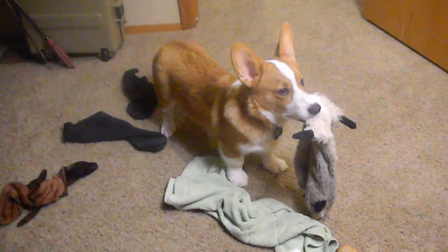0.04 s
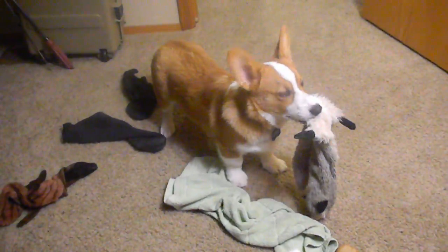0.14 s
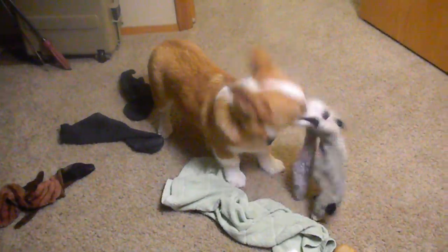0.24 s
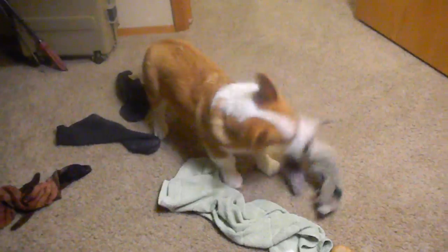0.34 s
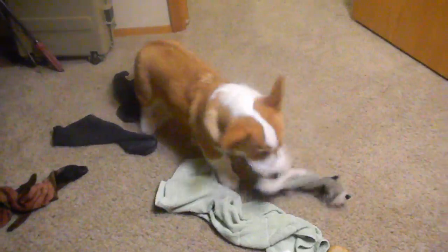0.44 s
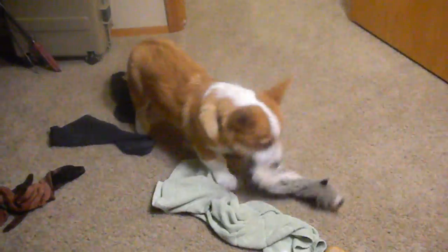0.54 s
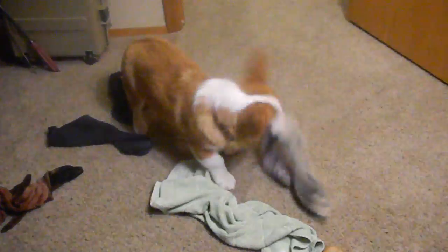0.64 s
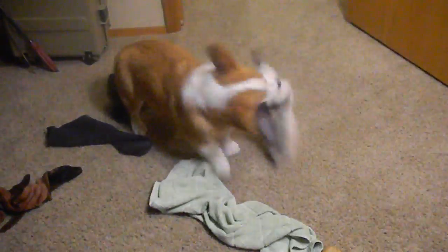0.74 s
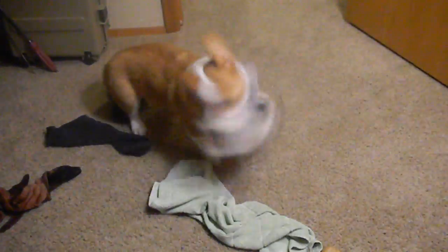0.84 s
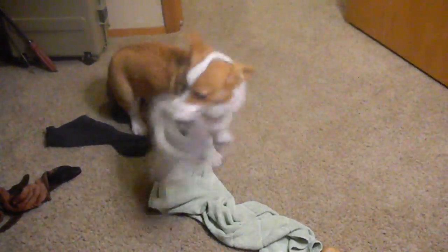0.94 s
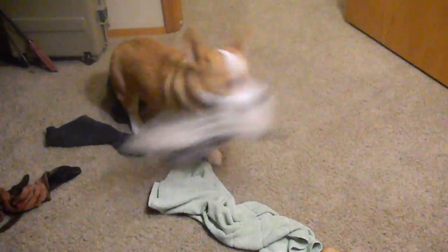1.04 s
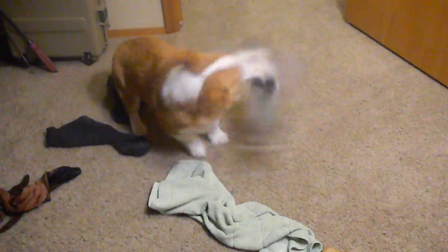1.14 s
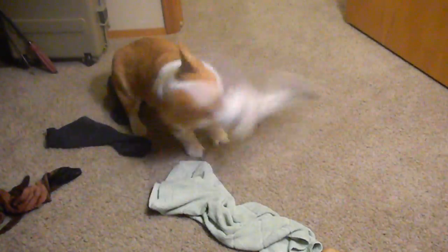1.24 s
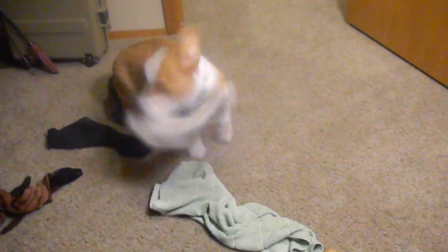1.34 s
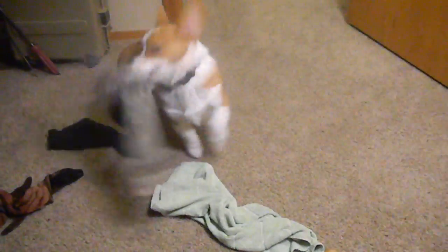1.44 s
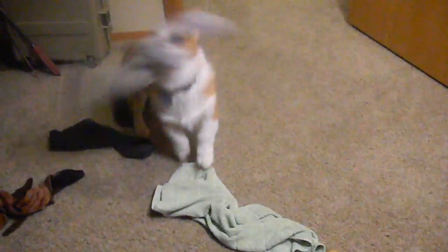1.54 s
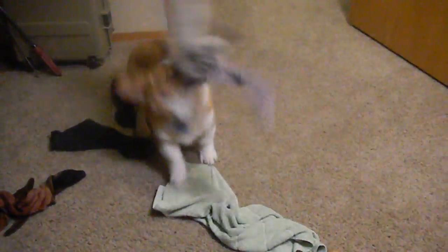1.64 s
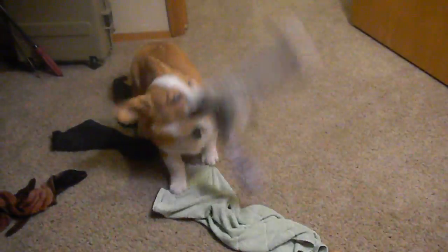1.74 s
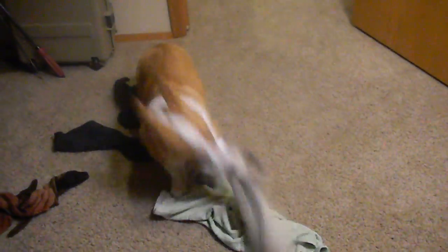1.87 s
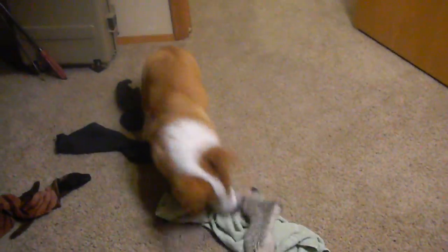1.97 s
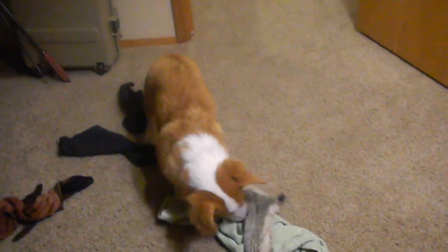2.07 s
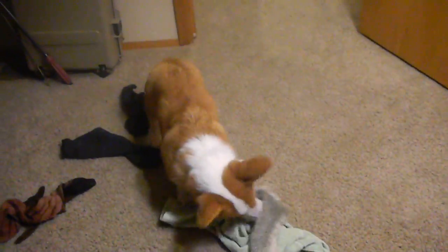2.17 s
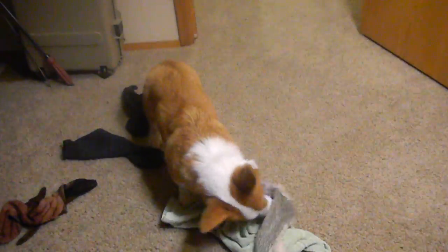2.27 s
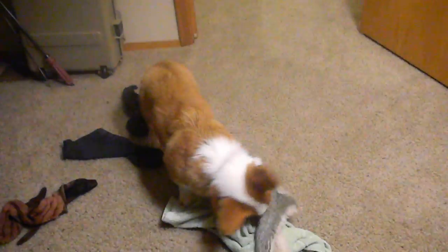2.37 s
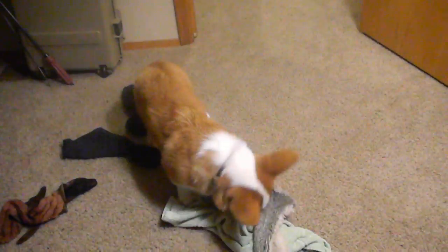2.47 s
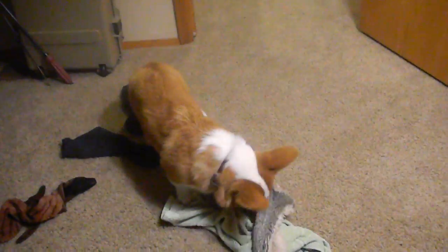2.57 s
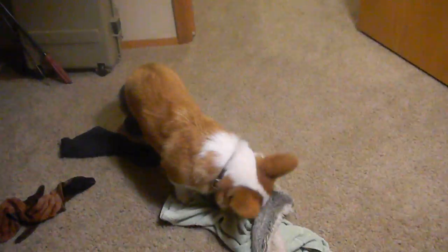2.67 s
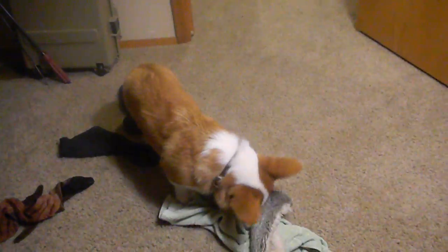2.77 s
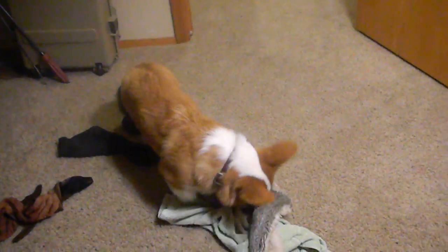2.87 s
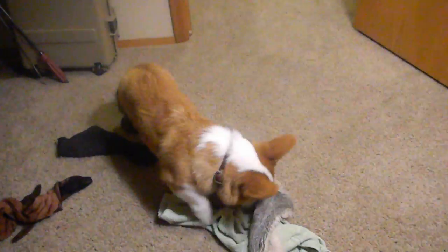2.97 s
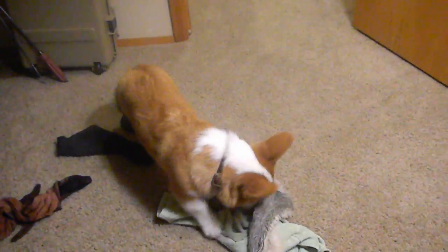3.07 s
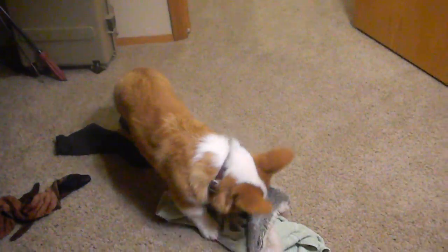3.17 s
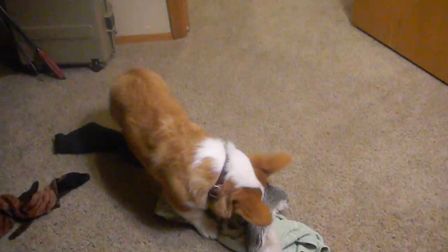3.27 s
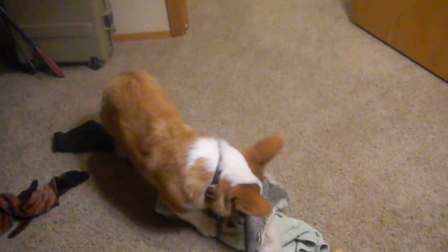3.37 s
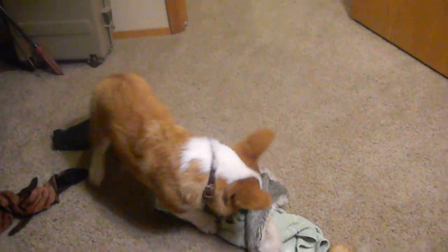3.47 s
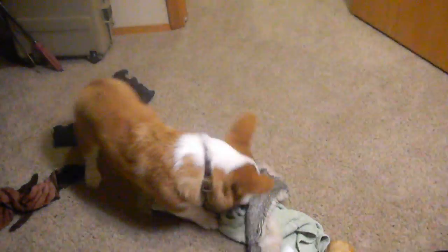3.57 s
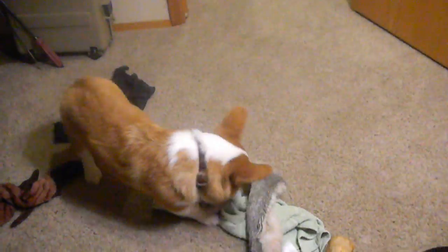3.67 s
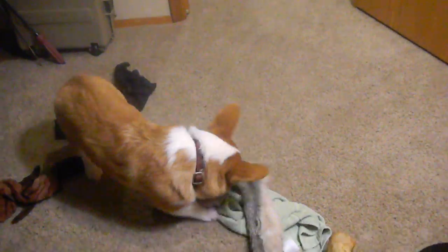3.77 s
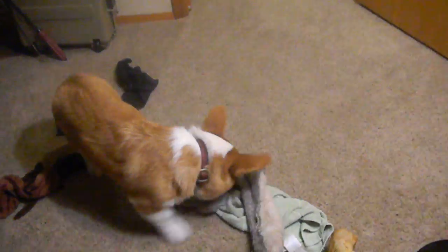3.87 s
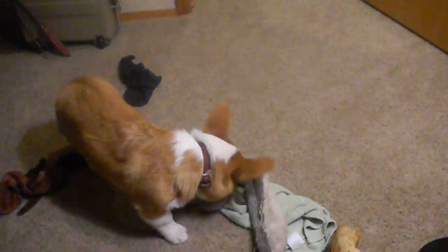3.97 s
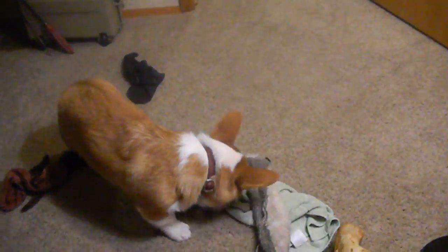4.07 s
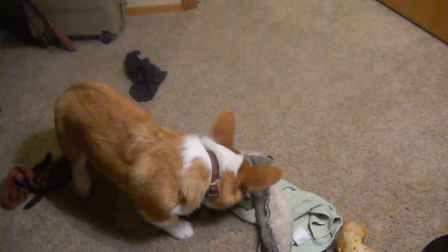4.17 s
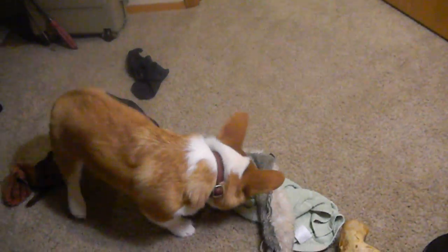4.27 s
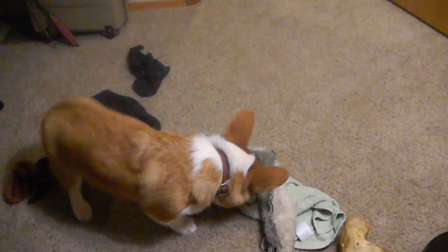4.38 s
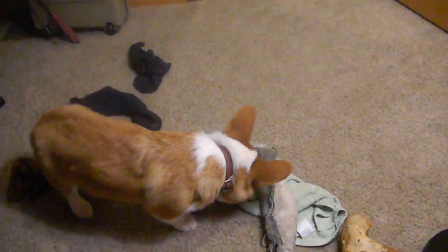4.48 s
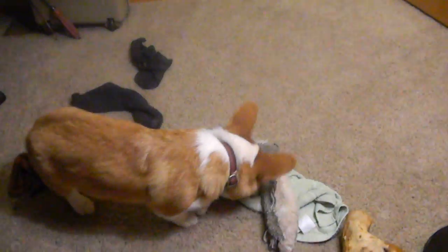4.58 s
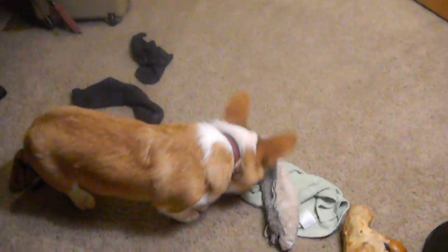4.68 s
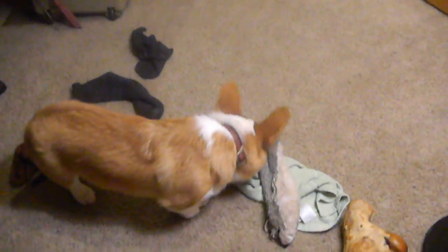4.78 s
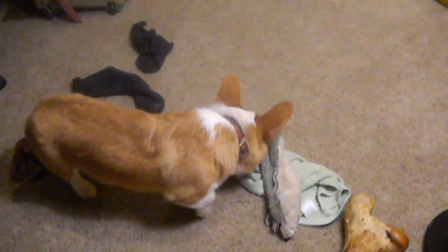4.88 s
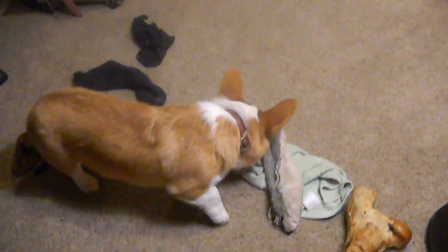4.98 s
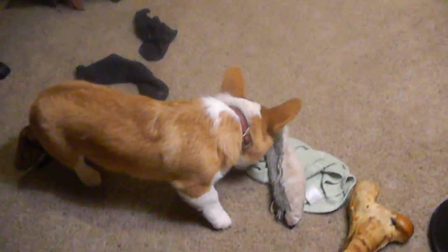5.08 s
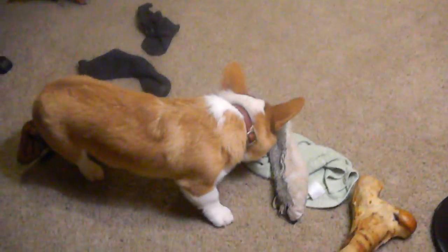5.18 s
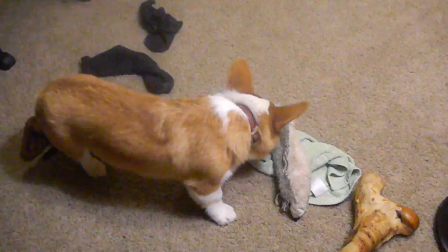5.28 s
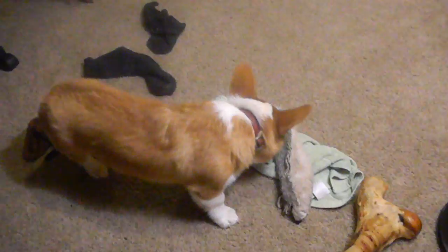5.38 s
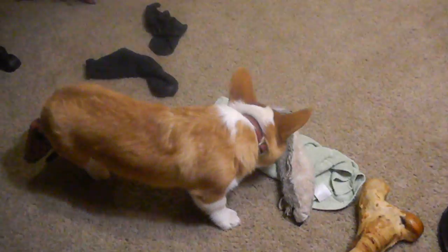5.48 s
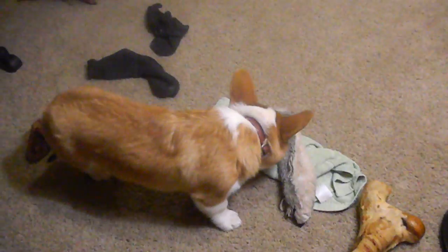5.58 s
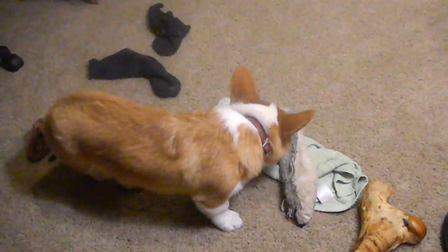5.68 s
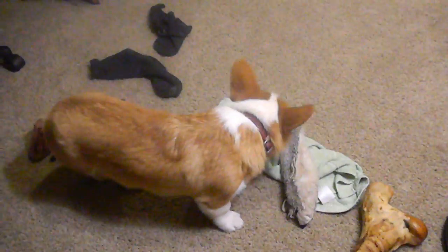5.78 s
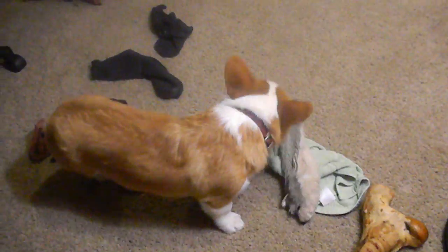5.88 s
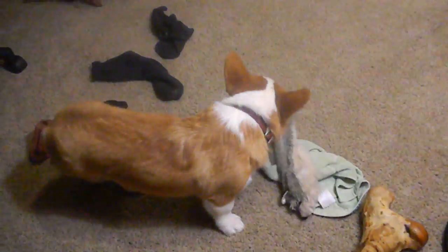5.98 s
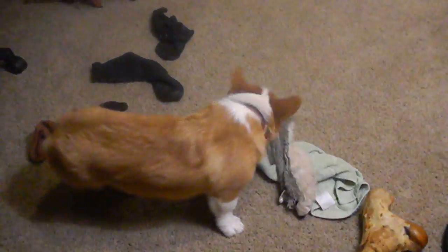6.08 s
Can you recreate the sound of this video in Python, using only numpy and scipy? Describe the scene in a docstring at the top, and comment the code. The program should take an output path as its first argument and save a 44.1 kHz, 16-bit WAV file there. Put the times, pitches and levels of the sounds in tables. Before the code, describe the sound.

Low room noise, a faint fan hum and thin hiss run throughout a small, carpeted, briefly reverberant room. Soft plush rustle starts around 0.6 seconds; crisp cloth and collar flicks cluster at 0.9 to 1.0, then a short dull slap at 1.2. More light flicks and a thump come near 1.4, rustling swishes at 1.7 to 1.8, and a hard slap with snaps and a deep floor boom at 1.95 to 2.1. It quietens to gentle rubbing, a hollow knock at 2.75, and very faint peeps at 2.9, 3.8 and 4.35. Chewing rustle continues from 4.3. A bright swooping squeak sounds at 4.57, a short nasal one at 4.9, then from 5.04 rapid irregular chirps, a longer loud blare at 5.23, a bright snap at 5.3, clustered squeaks at 5.4 to 5.75 and 5.85 to 6.1, mixed with small dull thuds. Close stereo pickup, slightly louder right.

```python
"""A puppy and its squeaking toy

A puppy shakes a plush toy, slaps it on the carpet, pounces, then chews on the squeaker inside.
Each bite drives air through a small plastic reed, a harmonic source whose pitch follows the push;
the reed sounds again as the bulb refills. Filtered noise makes the rustle, slaps and snaps,
and decaying modes the booms and rings. A small carpeted room answers briefly; a fan hums behind it all."""
import sys
import numpy as np
from scipy import signal
from scipy.fft import rfft, irfft, next_fast_len
from scipy.io import wavfile

SR = 44100
rng = np.random.default_rng(int(sys.argv[2]) if len(sys.argv) > 2 else 0)


def master(y):
    """Save y as 16-bit WAV."""
    cut = np.clip(np.atleast_2d(y).T, -1, 1)
    pcm = np.round(cut * 32767)  # scale
    wavfile.write(sys.argv[1], SR, pcm.astype(np.int16))


N = 269892
TIME = np.arange(N) / SR  # seconds

# Spectrum of the room air. Each row: frequency in Hz, relative power density in dB.
AIR_SPECTRUM = [(15, -43), (25, -33), (48, -11.5), (84, -4.5), (113, -9.5), (216, -6), (248, -17),
                (371, -2), (604, -14), (834, -15.5), (1320, -20), (1870, -22.5), (2520, -23.5),
                (2810, -26.5), (15800, -31)]
# Near reflections from door, case and walls. Each row: delay in seconds, level in dB before colouring.
REFLECTIONS = [(.0031, -45), (.0074, -21.5), (0.0105, -12.5), (0.0172, -16), (.0235, -16)]
# Spectrum of those reflections, weak in the bass. Each row: frequency in Hz, gain in dB.
REFLECTION_SPECTRUM = [(100, -10), (3000, -3), (10000, 2.5)]
# Spectrum of the reverberant tail. Each row: frequency in Hz, relative gain in dB.
TAIL_SPECTRUM = [(60, -10), (250, -3), (390, 9.5), (600, 3), (1300, 1), (2600, -0.5), (5000, 1.5),
                 (10000, -0.5), (16000, -13)]
# Gain of the tail's opposite-sign part in the two channels. Each row: frequency in Hz, gain in dB.
TAIL_SIDE = [(100, 2), (1300, -12.5), (4000, -5.5), (9000, -1.5), (13000, 8)]
# Balance of the two microphones. Each row: frequency in Hz, left minus right in dB.
LEFT_MINUS_RIGHT = [(60, -3), (500, -4), (2000, -4), (4000, -2.5), (8000, -2), (14000, -2)]
TOP_HZ = 15900  # upper limit of the overtones and of the final sound

# Strokes of plush and fur over the carpet.
# Each row: middle in seconds, half length in seconds (to 1/e), level in dB.
STROKES = [(0.645, 0.22, -49.5), (0.918, 0.072, -50), (1.082, 0.12, -50), (1.39, 0.11, -48.5),
           (1.694, 0.039, -46), (1.811, 0.054, -42), (2.022, 0.11, -52.5), (2.47, 0.047, -51.5),
           (2.638, 0.063, -47.5), (2.83, 0.13, -52.5), (3.522, 0.084, -51), (3.755, 0.019, -49.5),
           (3.937, 0.088, -44.5)]
# Spectrum of the rubbing fibres. Each row: frequency in Hz, relative gain in dB.
FIBRE_SPECTRUM = [(200, 1), (600, -2), (1500, -1.5), (2400, -3.5), (4500, -11.5), (9000, -18),
                  (16000, -14.5)]
CHEW_FROM_S, CHEW_RISE_S, CHEW_DB = 4.33, 0.29, -50  # the plush rustles on while it is chewed

# Blows of toy, paws and jaw on the floor. Each row: start in seconds, level in dB, upper edge of the slap
# in Hz, 60 dB decay of the push in seconds, boom in dB before a fixed 12 dB cut.
BLOWS = [(1.1828, -20.5, 2100, 0.0096, -17), (1.192, -33, 750, 0.044, -2.5),
         (1.411, -29, 1150, 0.023, -4.5), (1.768, -32, 1130, 0.05, -19), (1.9802, -19, 2700, 0.015, -34),
         (1.987, -27, 530, 0.03, -8), (2.047, -31.5, 242, .11, 0.5), (2.072, -42, 109, 0.33, 6),
         (4.635, -41, 186, .06, 1), (5.045, -38, 88, .022, -10), (5.163, -31.5, 523, 0.029, -11),
         (5.481, -37.5, 150, 0.047, -0.5), (5.533, -39.5, 102, 0.046, 2), (5.615, -28, 665, 0.017, -22),
         (5.873, -27.5, 590, 0.01, -14), (6.033, -35.5, 148, 0.034, -8)]
# Modes of the floor under the carpet. Each row: nominal frequency in Hz, relative level in dB,
# nominal 60 dB decay in seconds.
FLOOR_MODES = [(58.4, -3, 0.25), (85, -17, 0.11), (139, 6, 0.2), (172.6, 3, 0.23), (227, 2.5, 0.17)]
# Collar and toy flicking and snapping.
# Each row: start in seconds, level in dB, centre in Hz, 60 dB decay in seconds.
FLICKS = [(0.882, -35.5, 4640, 0.044), (.9224, -31, 1750, 0.022), (.963, -31.5, 6000, 0.032),
          (0.989, -38, 7260, 0.17), (1.018, -21, 6200, 0.026), (1.342, -36, 7140, 0.059),
          (1.362, -36.5, 5500, 0.046), (1.373, -38, 2480, 0.051), (1.8, -34.5, 4000, 0.045),
          (1.949, -21.5, 1990, 0.0061), (1.958, -25.5, 7900, .036), (1.973, -32, 3200, .027),
          (1.982, -19, 2360, 0.0073), (5.304, -21, 8800, 0.031)]
# Modes of the collar buckle. Each row: nominal frequency in Hz, relative level in dB,
# nominal 60 dB decay in seconds.
BUCKLE_MODES = [(5240, -18, .08), (6860, -5, 0.13), (7150, -2, 0.13), (9800, -29, .12), (12000, 7, 0.1)]
# The hollow knock as the muzzle drives the toy into the floor.
# Each row: frequency in Hz, level in dB, 60 dB decay in seconds.
KNOCK_MODES = [(160, -28.5, 0.15), (380.8, -25.5, 0.12), (432, -21.5, 0.047), (660, -21.5, 0.039)]
KNOCK_S = 2.7548  # start of the knock

# Radiation of the reed through bulb and plush as the bulb refills.
# Each row: frequency in Hz, relative gain in dB.
BLARE = [(700, 12), (1200, -0.5), (2500, 2), (3700, -5.5), (5000, -6.5), (6200, -9.5), (7500, -5),
         (8700, -5), (10000, -5), (11300, -11.5), (12400, -11), (13600, -23), (15500, -26)]
# Radiation of the reed on bites, chirps and peeps. Each row: frequency in Hz, relative gain in dB.
WHISTLE = [(700, -8), (1200, 5), (2400, 3.5), (3600, -4), (4900, -5), (5900, -17), (7600, -7.5),
           (8400, -11.5), (9750, -0.5), (11000, -19.5), (11900, -6.5), (13200, -30), (15000, -22)]
# Bites press the air out: the pitch swells to a crest and sinks as the bulb empties.
# Each row: start in seconds, length in seconds, crest in seconds after the start, half width of the crest
# in seconds, top in Hz, end in Hz, level in dB before the airflow, overtone tilt in dB per octave,
# presence in dB, roughness from 0 to 1.
BITES = [(4.571, 0.12, .028, .015, 2590, 1039, -19, -3.5, 1, 0.46),
         (5.421, 0.075, 0.023, 0.014, 2430, 1332, -18, 0.3, -3, 0.54),
         (5.54, .019, 0.0066, 0.0079, 1406, 1210, -15.5, 0.4, -3.5, 0.46),
         (6, .058, .018, .016, 1431, 1105, -16.5, -1, 1, 0.39),
         (6.07, 0.045, 0.02, 0.0067, 1357, 1226, -18, 0.4, 0.5, 0.59)]
# The jaw lets go and the bulb sucks air back in with a steadier blare.
# Each row: start in seconds, length in seconds, crest in seconds after the start, half width of the crest
# in seconds, top in Hz, end in Hz, level in dB before the airflow, overtone tilt in dB per octave,
# presence in dB, roughness from 0 to 1.
REFILLS = [(4.913, 0.036, 0.017, 0.0092, 1251, 1096, -14, 0.93, 4, 0.21),
           (5.227, .081, 0.035, .011, 1285, 1259, -11, 2, -2.5, 0.11),
           (5.599, 0.055, .025, 0.017, 1407, 1256, -14.5, 0.045, -3.5, 0.28),
           (5.659, 0.046, 0.023, 0.014, 1174, 1152, -16.5, -0.74, -3, .12),
           (5.921, 0.046, 0.017, .015, 1257, 1140, -13, -0.38, 9.5, 0.13)]
# Fast glides up or down under hard bites. Each row: start in seconds, length in seconds, first pitch in Hz,
# last pitch in Hz, level in dB before the airflow, presence in dB, roughness from 0 to 1.
CHIRPS = [(5.039, .018, 1280, 3470, -18, 2.5, 0.37), (5.14, .012, 2768, 1310, -16.5, -6, 0.35),
          (5.155, 0.01, 1334, 3190, -15, -2, 0.22), (5.175, 0.024, 2805, 1125, -19, -5.5, 0.61),
          (5.307, 0.0074, 1317, 1130, -14, 0, 0.26), (5.749, .011, 1346, 3300, -22, 4, 0.63),
          (5.853, .017, 2342, 1637, -20, 8, 0.5), (5.873, 0.014, 2480, 1280, -19, 7, 0.73)]
# Light nudges barely sound the reed. Each row: start in seconds, middle pitch in Hz, level in dB.
PEEPS = [(2.888, 1078, -41.5), (3.843, 1045, -43), (4.350, 1045, -42.5)]
# length in s, overtone tilt in dB per octave, roughness 0-1, fall of pitch in Hz per s
PEEP_S, PEEP_TILT_DB, PEEP_ROUGH, PEEP_SAG_HZ_PER_S = 0.017, -22, 0.73, 7400
# a squeeze starts from REST_HZ; the reed all but stops below STALL_HZ,
# strengthens over about OPEN_HZ above that, and closes at SHUT_HZ
REST_HZ, STALL_HZ, OPEN_HZ, SHUT_HZ = 1195.4, 1021.5, 353, 4120
CREST_STEEPNESS = 3.6  # how square the push of the jaw is
CHIRP_S, CHIRP_TILT_DB = 0.006, 0.17  # time constant of the glide; overtones in dB per octave
ATTACK_S, RELEASE_S = 0.002, 0.0026
BUILD_DB, BUILD_S = 6, 0.015  # a bite starts this much weaker and firms up with this time constant
TREMOR_DB, TREMOR_PER_S = 1.0, 137  # unsteady grip of the teeth
PRESENCE_HZ, PRESENCE_OCTAVES = 4000, 0.95  # band that varies as plush and muzzle uncover the squeaker
WOBBLE, WOBBLE_PER_S = 0.02, 150  # relative pitch wobble at full roughness; changes per second


def undb(db):
    """Decibels are logarithmic: amplitude gain is ten to the power of dB / 20."""
    return 10 ** (np.asarray(db) / 20)


def unit(x):
    """Normalisation: scale to root mean square 1."""
    return x / np.sqrt(np.mean(x ** 2) + 1e-18)


def gain_at(hz, points):
    """Spectral interpolation: gain from (Hz, dB) points, linear in dB over log frequency."""
    f, db = np.transpose(points)
    return undb(np.interp(np.log(np.maximum(hz, 1)), np.log(f), db))


def colour(x, points):
    """Linear filtering: multiply the spectrum of a sound by a (Hz, dB) curve."""
    length = x.shape[-1]
    size = next_fast_len(length + 2048)
    gain = gain_at(np.fft.rfftfreq(size, 1 / SR), points)
    return irfft(rfft(x, size) * gain, size)[..., :length]


def resonate(x, hz, q):
    """Resonance: a second-order peak with gain 1 at its centre."""
    hz = min(hz, SR / 3)
    b, a = signal.iirpeak(hz, max(q, 3 * hz / SR), fs=SR)
    return signal.lfilter(b, a, x)


def wander(size, rate):
    """Random modulation: rms 1, straight lines between `rate` random values a second."""
    knots = np.arange(size) * rate / SR
    count = int(knots[-1]) + 2
    return unit(np.interp(knots, np.arange(count), rng.standard_normal(count)))


def fade(t, t60):
    """Exponential decay: 60 dB lost in t60 seconds."""
    return np.exp(-np.log(1000) * t / t60)


def ring(modes, t):
    """Modal superposition: a struck body sounds as a sum of decaying sines."""
    return sum(undb(db) * np.sin(2 * np.pi * hz * t) * fade(t, t60) for hz, db, t60 in modes)


def add(track, s, x):
    """Superposition: mix x into the track from time s."""
    start = int(s * SR)
    track[start:start + len(x)] += x[:max(N - start, 0)]


def background(air_db=-50, fan_db=-55, hiss_db=-61, apart_db=-14):
    """Stationary noise: room air, a fan's hum by resonance, and a separate thin hiss in each channel."""
    air = unit(colour(rng.standard_normal(N), AIR_SPECTRUM))
    apart = unit(colour(rng.standard_normal(N), AIR_SPECTRUM)) * np.array([[1], [-1]])
    fan = unit(resonate(resonate(rng.standard_normal(N), 388.0, 11.0), 384.7, 10.0))
    hiss = colour(rng.standard_normal((2, N)), [(1000, 15.2), (6000, 9.3), (15000, 7.8)])
    wide_air = undb(air_db) * (air + undb(apart_db) * apart)
    return wide_air + undb(fan_db) * fan + undb(hiss_db) * hiss


def room(x, t60=0.2, tail_db=-6.5, build=0.0045):
    """Convolution with an impulse response: direct sound, near reflections and a short stereo tail."""
    t = np.arange(SR // 2) / SR
    direct, early = np.zeros((2, len(t)))
    direct[0] = 1
    for delay, db in REFLECTIONS:
        early[int(delay * SR)] += undb(db)
    envelope = fade(t, t60) * np.minimum(t / build, 1)
    tails = colour(rng.standard_normal((2, len(t))), TAIL_SPECTRUM) * envelope
    mid, side = undb(tail_db) * unit(tails) / np.sqrt(len(t))
    shared = direct + colour(early, REFLECTION_SPECTRUM) + mid
    response = shared + colour(side, TAIL_SIDE) * np.array([[1], [-1]])
    return signal.fftconvolve(x[None], response, axes=1)[:, :N]


def rubbing(grain_db=4):
    """Stick-slip friction: fibres catch and let go in a fine uneven rustle that swells with each stroke."""
    grain = undb(grain_db * wander(N, 500) + 2 * wander(N, 30))
    fibres = rng.standard_normal(N) * grain
    strokes = sum(undb(db) * np.exp(-((TIME - s) / half) ** 2) for s, half, db in STROKES)
    chewing = undb(CHEW_DB) * np.clip((TIME - CHEW_FROM_S) / CHEW_RISE_S, 0, 1)
    return unit(colour(fibres, FIBRE_SPECTRUM)) * (strokes + chewing)


def thump(db, dull_hz, length, boom_db):
    """Padded impact: a band-limited slap, duller the softer the contact, with the floor's modes booming."""
    t = np.arange(SR // 3) / SR
    push = fade(t, length) * np.minimum(t / 0.0007, 1)
    band = [min(dull_hz / 2, 330), min(dull_hz, SR / 3)]
    bandpass = signal.butter(2, band, "band", fs=SR, output="sos")
    slap = signal.sosfilt(bandpass, rng.standard_normal(len(t)) * push)
    slap = unit(slap) * np.sqrt(np.mean(push ** 2))  # as strong as the push
    # every spot of the floor is tuned a little differently
    boom = ring(FLOOR_MODES, t * (1 + 0.041 * rng.standard_normal()))
    return undb(db) * (undb(3) * slap + undb(boom_db - 12) * boom)


def flick(db, hz, length, grain_db=3):
    """Impulsive noise: a crackly snap of cloth or collar, with the buckle ringing most in the bright ones."""
    t = np.arange(SR // 4) / SR
    crackle = rng.standard_normal(len(t)) * undb(grain_db * wander(len(t), 700))
    snap = unit(resonate(resonate(crackle, hz, 1.2), hz, 1)) * fade(t, length)
    ringing = ring(BUCKLE_MODES, t * (1 + 0.004 * rng.standard_normal()))
    buckle = resonate(ringing, hz, 2)
    return undb(db) * (snap + undb(-13) * buckle)


def knock(rise=0.0017):
    """Modal impact: a hollow knock whose modes set in over the rise time and die away."""
    t = TIME[:SR // 3]
    return ring(KNOCK_MODES, t) * np.minimum(t / rise, 1)


def squeak(voice, tilt_db, presence_db, rough, glide, flutter=0.35, puff_db=-35, hiss_db=-7.5):
    """Reed excitation: air chopped into harmonics of the gliding pitch; a loosely driven reed wavers."""
    size = len(glide)
    pitch = glide * (1 + 0.02 * rough * wander(size, 450))
    # a slack reed closes a little early or late each cycle, which blurs its high harmonics
    jitter = 0.5 * rough ** 2 * wander(size, 1300)
    phase = 2 * np.pi * np.cumsum(pitch) / SR + jitter
    k = np.arange(1, 15)[:, None]  # harmonic numbers
    overtones = k * pitch
    # each harmonic changes level as it glides through the presence band
    presence = np.exp(-(np.log2(overtones / PRESENCE_HZ) / PRESENCE_OCTAVES) ** 2)
    emphasis = undb(tilt_db * np.log2(k) + presence_db * presence)
    partials = gain_at(overtones, voice) * emphasis * (overtones < TOP_HZ)
    # the bulb delays the high harmonics, spreading each pulse
    pulses = (partials * np.sin(k * phase - k ** 2 / 5)).sum(0)
    reed = pulses / np.sqrt((partials ** 2).sum(0) / 2)  # steady power
    reed *= 1 + flutter * rough * wander(size, 409)
    # air hisses through the slit once a cycle and puffs dully into the stuffing
    jet = rng.standard_normal(size) * (1 + np.cos(phase))
    air = colour(jet, [(1000, -14.5), (3000, 1.5), (9000, -1)])
    hiss = rough * undb(hiss_db) * unit(colour(air, voice))
    puff = unit(resonate(rng.standard_normal(size), 280, 0.89))
    return reed + hiss + undb(puff_db) * puff


def span(s, length):
    """Time base: instants through a squeak, with its attack and release."""
    return np.arange(-ATTACK_S, length + RELEASE_S, 1 / SR) + s


def airflow(t, s, length, pitch):
    """Pressure-driven reed: strength grows with the pressure that raises pitch, and chokes as it shuts."""
    corners = [s - ATTACK_S, s, s + length, s + length + RELEASE_S]
    gate = np.interp(t, corners, [0, 1, 1, 0])
    drive = np.tanh(np.maximum(pitch - STALL_HZ, 1) / OPEN_HZ)
    slit = np.maximum(1 - (pitch / SHUT_HZ) ** 4, 0)
    return gate * drive * slit * undb(TREMOR_DB * wander(len(t), TREMOR_PER_S))


def firming(t, s):
    """Exponential approach: the jaw takes a moment to get its grip."""
    return undb(-BUILD_DB * np.exp(-np.maximum(t - s, 0) / BUILD_S))


def squeeze(voice, s, length, crest, width, top_hz, end_hz, db, tilt_db, presence_db, rough):
    """Pitch follows pressure: one push of air lifts it from rest to a rounded crest, then to its end value."""
    t = span(s, length)
    push = 1 / (1 + np.abs((t - s - crest) / width) ** CREST_STEEPNESS)
    slack = np.interp(t, [s, s + length], [REST_HZ, end_hz])
    # the reed is steadiest at the crest and wobbles on the slack flow either side
    wobble = 1 + WOBBLE * rough * (1 - push / 2) * wander(len(t), WOBBLE_PER_S)
    pitch = (slack + (top_hz - slack) * push) * wobble
    flow = undb(db) * airflow(t, s, length, pitch)
    if voice is WHISTLE:  # bites only
        flow = flow * firming(t, s)
    return t[0], flow * squeak(voice, tilt_db, presence_db, rough, pitch)


def chirp(s, length, from_hz, to_hz, db, presence_db, rough):
    """Exponential glide: the pitch moves fastest at its high end, where the reed is nearest to shut."""
    t = span(s, length)
    rate = (1 if to_hz > from_hz else -1) / CHIRP_S
    progress = np.expm1(rate * np.clip(t - s, 0, length)) / np.expm1(rate * length)
    pitch = from_hz + (to_hz - from_hz) * progress
    flow = undb(db) * airflow(t, s, length, pitch)
    return t[0], flow * squeak(WHISTLE, CHIRP_TILT_DB, presence_db, rough, pitch)


def peep(s, hz, db):
    """Weak excitation: a faint, breathy note with few overtones that sags as it goes."""
    t = np.arange(0, PEEP_S, 1 / SR)
    swell = np.sqrt(np.sin(np.pi * t / PEEP_S))
    pitch = hz - PEEP_SAG_HZ_PER_S * (t - PEEP_S / 2)
    return s, undb(db) * swell * squeak(WHISTLE, PEEP_TILT_DB, 0, PEEP_ROUGH, pitch)


def squeaker():
    """Two-way flow: air whistles out of the bulb on each bite and blares back in on each release."""
    track = np.zeros(N)
    for row in BITES:
        add(track, *squeeze(WHISTLE, *row))
    for row in REFILLS:
        add(track, *squeeze(BLARE, *row))
    for row in CHIRPS:
        add(track, *chirp(*row))
    for row in PEEPS:
        add(track, *peep(*row))
    return track


def scene(squeak_db=-1.0):
    """Superposition of sources: all the puppy's sounds share one spot of the room, over the background."""
    dog = rubbing()
    for s, *blow in BLOWS:
        add(dog, s, thump(*blow))
    for s, *snap in FLICKS:
        add(dog, s, flick(*snap))
    add(dog, KNOCK_S, knock())
    return room(dog + undb(squeak_db) * squeaker()) + background()


def record(dry):
    """Stereo pickup: the right microphone is the louder one; a steep low-pass cuts the top."""
    sides = []
    for x, sign in zip(dry, (1, -1)):
        half_balance = [(hz, sign * db / 2) for hz, db in LEFT_MINUS_RIGHT]
        sides.append(colour(x, half_balance))
    lowpass = signal.ellip(10, 0.2, 80, TOP_HZ, fs=SR, output="sos")
    return signal.sosfilt(lowpass, sides)


dry = scene()
out = record(dry)
master(out)
```